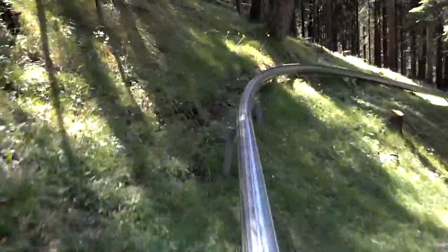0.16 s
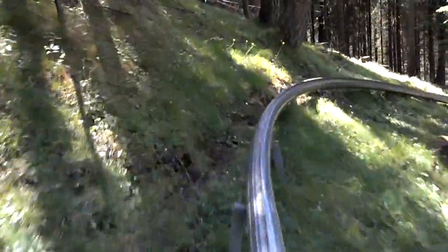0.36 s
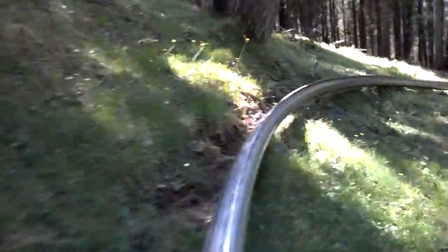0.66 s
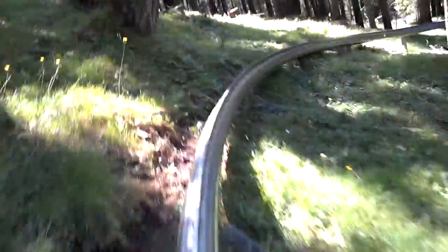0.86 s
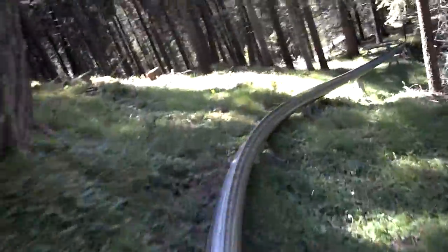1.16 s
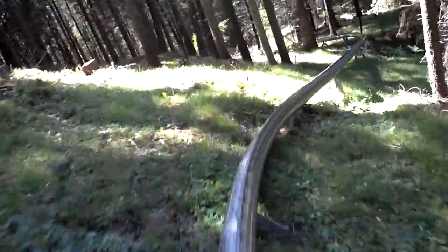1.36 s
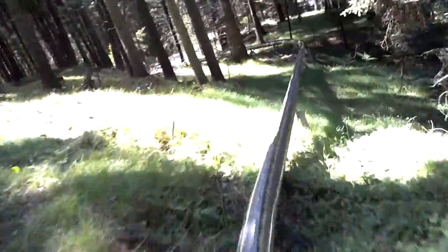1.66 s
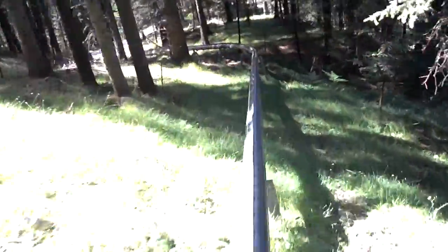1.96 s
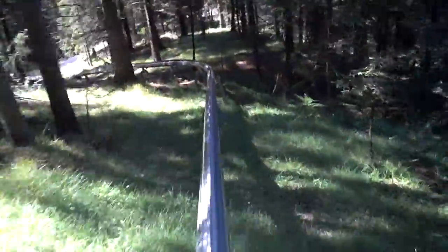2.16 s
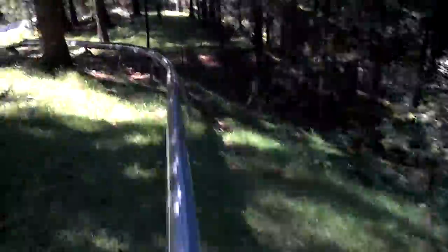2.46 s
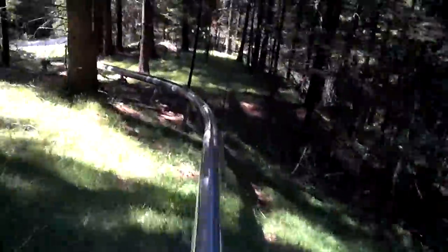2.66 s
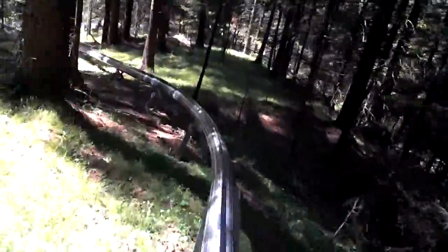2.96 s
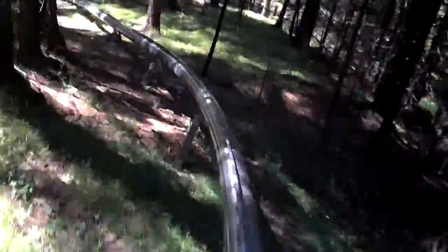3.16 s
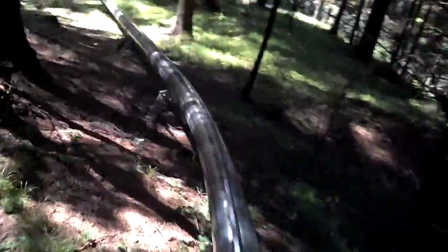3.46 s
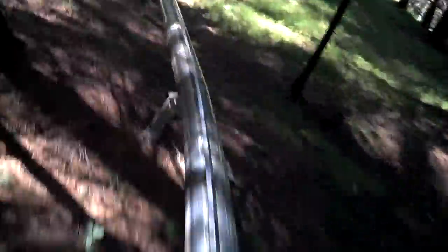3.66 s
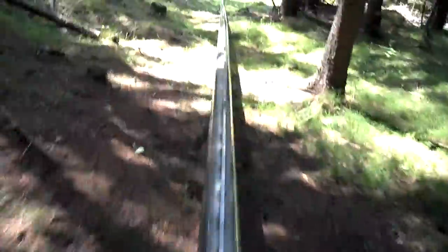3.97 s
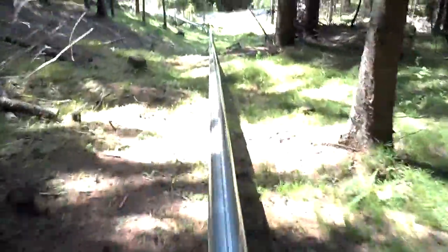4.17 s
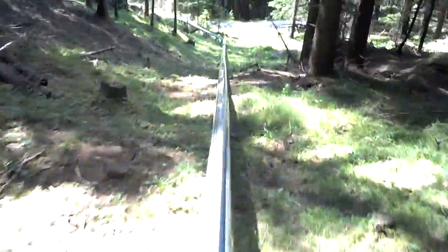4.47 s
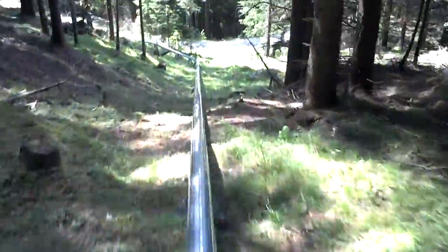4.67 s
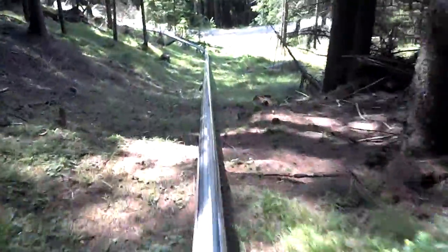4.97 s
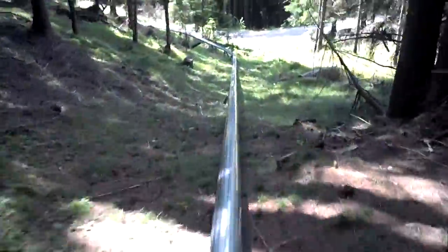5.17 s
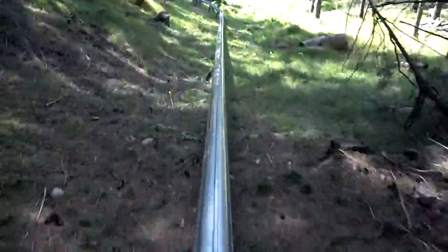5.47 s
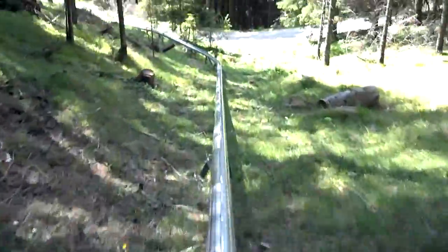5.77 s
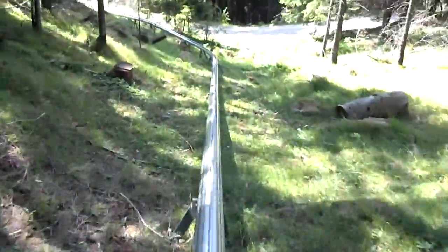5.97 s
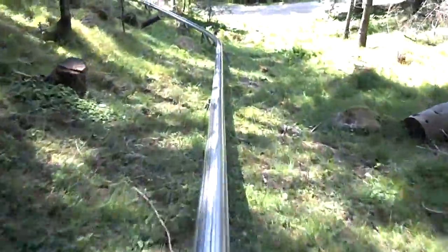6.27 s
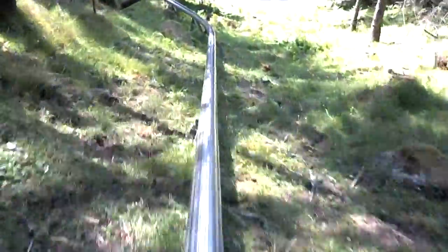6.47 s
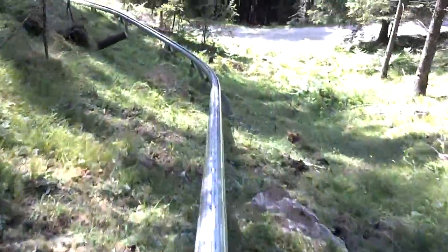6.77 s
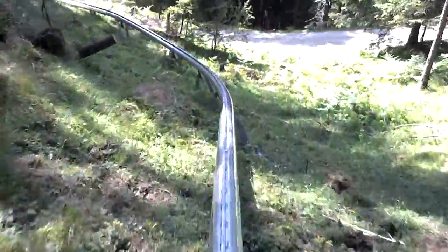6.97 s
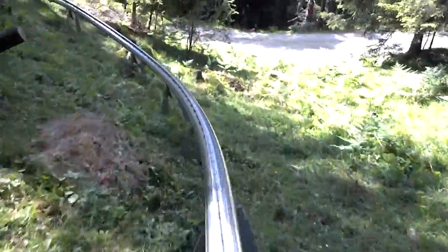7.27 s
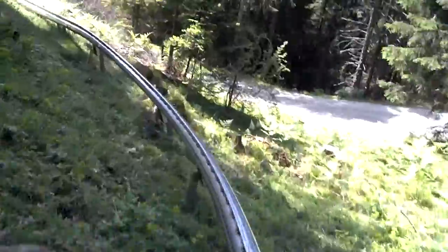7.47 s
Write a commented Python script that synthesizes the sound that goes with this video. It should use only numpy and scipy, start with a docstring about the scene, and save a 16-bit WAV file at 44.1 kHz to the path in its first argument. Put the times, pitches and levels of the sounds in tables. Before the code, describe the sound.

Heard from the moving sled itself, wheels drone and rattle continuously along a steel rail outdoors. Irregular thumps, knocks and bright clinks jolt the frame, one especially hard early on. The middle is somewhat quieter with faint whines and loose ticking; then a wheel's flat spot chatters fast and loudly before easing back to rough rolling and knocks. Low wind buffets the microphones.

```python
"""Sled on a steel tube rail

A sled rolls down a steel rail, heard through two microphone ports in a case that rides on it.
Wheel drone, frame rattle and scraping are noise through resonances; a flat spot knocks once a turn and chatters.
Joints thump and jolt the frame as short rings and bursts, parts tick and clink, grit crackles, tones whine.
Low wind noise buffets the case. Each channel is one port minus the other, delayed."""
import sys
import numpy as np
from scipy import signal
from scipy.fft import rfft, irfft, next_fast_len
from scipy.io import wavfile
from scipy.ndimage import uniform_filter1d

SR = 44100
rng = np.random.default_rng(int(sys.argv[2]) if len(sys.argv) > 2 else 0)


def materialize(psi):
    """Save the field psi as 16-bit PCM at rate SR to the path in sys.argv[1].

    A 1-D psi becomes a single channel; in a 2-D psi each row is a channel.
    """
    bounded = np.clip(np.atleast_2d(psi).T, -1, 1)
    quanta = np.round(bounded * 32767).astype(np.int16)
    wavfile.write(sys.argv[1], SR, quanta)


N = 335601
LEAD_S = .005  # soft start ahead of each blow

# rolling levels: time_s [s], frame_db [dB], drone_db [dB]
ROLLING = [(0, -25, -21), (.25, -25.5, -27.5), (.6, -23.5, -30.5), (.72, -21, -22), (1.1, -27, -27.5),
           (1.52, -21.5, -23), (1.7, -28, -28.5), (1.92, -27, -24.5), (2.3, -29.5, -32.5),
           (2.55, -32.5, -29.5), (2.9, -34, -28), (3.25, -26.5, -29.5), (3.5, -27.5, -26), (3.8, -30, -24),
           (4.15, -19.5, -25.5), (4.42, -24.5, -25), (4.72, -31, -28), (5.05, -24, -22), (5.45, -26.5, -28),
           (5.7, -23.5, -22.5), (6.0, -27.5, -23), (6.3, -19, -20), (6.8, -22, -20.5), (7.05, -21.5, -27),
           (7.3, -23.5, -23), (7.61, -18.5, -18.5)]
# flat spot's share of the wheel drone's power: time_s [s], share [0-1]
FLAT_SHARE = [(0.0, .8), (0.33, .8), (0.4, .2), (2.4, .2), (2.47, .96), (3.0, .96), (3.3, .75), (3.6, .5),
              (4.1, .4), (4.45, .3), (4.55, .97), (5.02, .97), (5.2, .65), (5.4, .45), (5.9, .55),
              (6.3, .6), (6.95, .55), (7.0, .2), (7.61, .2)]
# frame resonances: pitch_hz [Hz], width_hz [Hz], level_db [dB, relative]
FRAME = [(369, 150, -1.5), (627, 110, 0), (787, 181, -4), (1200, 260, -9.5), (1420, 162, -10),
         (1680, 136, -7.5), (1850, 254, -9.5), (2350, 300, -13.5)]
# rail resonances, a low, a middle and a high table: pitch_hz [Hz], width_hz [Hz], level_db [dB, relative]
RAIL = [
    [(605.6, 57, 2.5), (662.5, 53, 2)],
    [(888, 78, 4), (1055, 53, 4.5)],
    [(1545, 100, 3), (1790, 85, 8), (1905, 320, 1.5)],
]
# ringing steel parts: pitch_hz [Hz], width_hz [Hz], level_db [dB, relative]
STEEL = [(3227, 62, 3.2), (4020, 260, 3), (5200, 590, 5.3), (6730, 91, 1), (9370, 32, 2), (9800, 62, 1.4)]
# flat-spot blows: time_s [s], peak_db [dB], low_db, middle_db, high_db [dB, ring balance],
# tick_db [dB against peak_db]
CHATTER = [(5.224, -15, -8, -13, -27, -32), (5.256, -12, -7, -13, -15, -27),
           (5.291, -9.5, -12, -14, -12, -34), (5.33, -14, -1, -24, -10, -39), (5.362, -10, 0, -11, -9, -40),
           (5.401, -10.5, 1, -28, -15, -41), (5.434, -11, -7, -13, -7, -28), (5.47, -8, -5, -11, -6, -23),
           (5.504, -7, -6, -9, -6, -24), (5.539, -8.5, -5, -12, -10, -27), (5.579, -19, 2, -6, -2, -29),
           (5.612, -6.5, -7, -7, -4, -26), (5.647, -6.5, -5, -11, -11, -30),
           (5.678, -12.5, -8, -16, -8, -13), (5.714, -14, -2, -14, 3, -24), (5.75, -6, -2, -15, -11, -32),
           (5.786, -15.5, 1, -4, -6, -18), (5.824, -7, -1, -23, -13, -26), (5.855, -7.5, -3, -15, -21, -41),
           (5.89, -14.5, 0, -7, -12, -37), (5.924, -7, -11, -10.5, -12, -31),
           (5.958, -6, -2.5, -11, -8.5, -29), (5.992, -6.5, -8.5, -14, -16, -26),
           (6.028, -5.5, -2, -10, -11, -32), (6.061, -6.5, -6.5, -20, -14, -27),
           (6.095, -6, -7, -13, -9, -24), (6.132, -5.5, -7, -12.5, -12, -29),
           (6.167, -8.5, 2, -17, -16, -41), (6.201, -7, -9, -14, -11, -27), (6.236, -5, -14, -9, -9, -28),
           (6.268, -7, -14, -9, -3, -25), (6.303, -3, -6, -13, -13, -25), (6.338, -9, -4, -16, -11, -22),
           (6.375, -6, 0, -22, -8, -38), (6.41, -5.5, -5, -26, -6, -35), (6.443, -5.5, 3, -27, -6, -35),
           (6.477, -7, -4, -7, -9, -29), (6.515, -11, -7, -12, -7, -27), (6.548, -5.5, -2, -18, -11, -36),
           (6.58, -7, -4, -11, -7, -24), (6.615, -4.5, -9, -8.5, -9, -30), (6.65, -3.5, -6, -9, -8, -31),
           (6.685, -3.5, -8, -10, -10, -22), (6.719, -5.5, -15, -11, -14, -27),
           (6.753, -4.5, -12, -10, -10, -23), (6.787, -7, -16, -12, -9, -23),
           (6.822, -5, -8.5, -7, -8, -24), (6.858, -4, -11, -5, -2, -28), (6.892, -1.5, -11, -5, -6, -25),
           (6.927, -3.5, -11, -9, -12, -26), (6.945, -7, -14, -8, -7, -15)]


def gain_of(db):
    """dB to gain."""
    return 10 ** (np.asarray(db) / 20)


def evened(x):
    """Scales each row to rms 1."""
    return x / np.sqrt(np.mean(abs(x) ** 2, -1, keepdims=True) + 1e-20)


def read(points, hz, axis=1):
    """A column of a table over log frequency."""
    table = np.array(points)
    return np.interp(np.log(hz + 1), np.log(table[:, 0] + 1), table[:, axis])


def curve(rows, axis=1):
    """A column of a table over time."""
    table = np.array(rows)
    return np.interp(np.arange(N) / SR, table[:, 0], table[:, axis])


def lumps(per_s):
    """Random unevenness of rms 1 that changes about per_s times a second."""
    span = max(round(SR / per_s / 2), 1)
    smoothed = uniform_filter1d(rng.standard_normal(N), span)
    return evened(uniform_filter1d(smoothed, span))


def modes(table, hz):
    """Response of a body: single poles of alternating sign."""
    return sum((-1) ** k * gain_of(db) / (1 + 2j * (hz - f) / w) for k, (f, w, db) in enumerate(table))


def case(hz):
    """The steep low-pass of the case."""
    b, a = signal.butter(4, 1930, analog=True)  # cutoff in Hz, as is hz
    return signal.freqs(b, a, hz)[1]


def muffled(hz):
    """Frame resonances behind the case."""
    return modes(FRAME, hz) * case(hz)


def metal(hz):
    """Colour of scraping and ticking steel: a broad slope with a few ringing parts."""
    # broad colour: pitch_hz [Hz], level_db [dB, relative]
    slope = [(1500, -1.5), (2600, 6.5), (3300, 0), (4100, -3), (5200, -7), (6000, -3.5), (6700, -4.5),
             (7500, -5.5), (9000, -15.5), (9800, -17.5), (11000, -22.5), (13000, -24), (14800, -41),
             (15600, -44)]
    return gain_of(read(slope, hz)) * np.sqrt(1 + abs(modes(STEEL, hz)) ** 2)


def at_ports(envelope, colour, noisy=True):
    """Noise under an envelope (or bare pulses), coloured; the second port shares only part of it."""
    # second port: pitch_hz [Hz], level_db [dB against the first], likeness [0-1]
    ports = [(193, 7.5, 1), (375, 4, 1), (630, -5, 0.99), (810, -5, 1), (1084, -2.5, 0.54),
             (1780, -8.5, 0.31), (2800, -11, 0.5), (3400, 4.5, 0.06), (5800, 1, 0), (9440, 3.5, 0),
             (10200, -19, 0)]
    size = envelope.shape[-1]
    hz = np.fft.rfftfreq(size, 1 / SR)
    noise = rng.standard_normal((*envelope.shape[:-1], 2, size)) if noisy else np.ones((2, 1))
    z = rfft(noise * envelope[..., None, :])
    same = np.clip(read(ports, hz, axis=2), 0, 1)
    # the unlike part is separate noise, or for pulses the same pulse turned a quarter cycle
    other = np.sqrt(1 - same ** 2) * (1 if noisy else .5j)
    second = gain_of(read(ports, hz)) * (same * z[..., 0, :] + other * z[..., 1, :])
    both = np.stack([z[..., 0, :], second], -2)
    return irfft(both * evened(colour(hz))[..., None, :], size)


def add(mix, s, db, sounds, peak=False):
    """Lays each sound at its time; db is the first port's rms over its loudest 5 ms, or its peak."""
    length = sounds.shape[-1]
    fade = signal.windows.tukey(2 * length, .3)[length:]
    fade = fade * np.sin(np.pi / 2 * np.minimum(np.arange(length) / (LEAD_S * SR), 1)) ** 2
    for at, level_db, x in zip(s.ravel(), db.ravel(), sounds):
        part = mix[:, max(round(at * SR), 0):][:, :length]
        loudest = abs(x[0]).max() if peak else np.sqrt(uniform_filter1d(x[0] ** 2, size=220).max())
        part += (gain_of(level_db) * x * fade / loudest)[:, :part.shape[1]]


def rolling():
    """Uneven contact drives wheels, frame, metal and rail together; loose parts add small random rattles."""
    # wheel resonances: pitch_hz [Hz], width_hz [Hz], level_db [dB, relative]
    wheels = [(225.7, 35, -3), (315, 55, -2.5), (365, 114, -9.5)]
    # hum of the rail's low ring: time_s [s], level_db [dB]
    rail_hum = [(5.1, -52), (5.35, -33), (5.8, -29), (6.1, -37), (6.45, -27.5), (6.9, -29), (7.1, -47),
                (7.35, -40), (7.5, -23), (7.61, -37)]
    contact = lumps(per_s=21.7)
    sizes = gain_of(1.3 * np.minimum(rng.exponential(1, N), 4))
    blows = sizes * (rng.random(N) < 90. / SR)  # about 90 a second
    rattles = evened(signal.lfilter([1], [1, -np.exp(-1 / (0.0032 * SR))], blows))  # 3.2 ms decay
    size = next_fast_len(N)
    # unevenness in dB, amount of rattle, colour, level; metal splits at 7600 Hz into scrape and bright edge
    parts = [
        (1.5, .05, lambda hz: modes(wheels, hz), gain_of(curve(ROLLING, axis=2))),
        (2.4, 0.14, muffled, gain_of(curve(ROLLING))),
        (2.3, 0.33, lambda hz: metal(hz) / (1 + (hz / 7600) ** 6), scraping(axis=1)),
        (3.5, 0.28, lambda hz: metal(hz) / (1 + (7600 / (hz + 1)) ** 6), scraping(axis=2)),
        (1.8, .05, lambda hz: modes(RAIL[0], hz) * case(hz), gain_of(curve(rail_hum)))]
    out = np.zeros((2, N))
    for k, (uneven_db, loose, colour, level) in enumerate(parts):
        own = 0.46 * lumps(per_s=9.1)  # each part also wanders on its own
        drive = evened(gain_of(uneven_db * (contact + own)) + loose * rattles) * level
        if k == 0:  # the flat spot plays the rest of the drone
            drive *= np.sqrt(1 - np.clip(curve(FLAT_SHARE), 0, 1))
        out += at_ports(np.pad(drive, (0, size - N)), colour)[:, :N]
    return out


def scraping(axis):
    """Level of the steady scrape (axis 1) or its bright edge (axis 2), with scuffs swelling over it."""
    # steady scrape: time_s [s], scrape_db [dB], edge_db [dB]
    steady = [(0, -36.5, -54), (.25, -46.5, -57.5), (.7, -41.5, -56), (1.3, -43, -56.5), (1.75, -48.5, -69),
              (2.15, -47, -57), (2.3, -55, -67), (2.65, -53.5, -70), (3.05, -49, -59), (3.4, -48.5, -60),
              (3.6, -55, -68), (3.9, -57, -78), (4.1, -44, -61), (4.4, -37.5, -53), (4.66, -49.5, -66),
              (5.3, -48.5, -60), (6.2, -50, -75), (6.5, -44.5, -57), (7.1, -45.5, -56.5),
              (7.55, -44.5, -55)]
    # short scuffs: middle_s [s], scrape_db [dB], edge_db [dB], length_s [s]
    scuffs = [(0.361, -36.5, -43, 0.12), (0.631, -45, -71, .05), (0.799, -36.5, -47, 0.12),
              (0.926, -54, -51, .06), (1.005, -58, -53, 0.053), (1.525, -45, -50, 0.16),
              (1.64, -40, -43, 0.12), (1.888, -45, -74, 0.08), (1.959, -43, -53, .06),
              (2.388, -39.5, -48.5, 0.31), (2.824, -46, -59, 0.16), (3.39, -42, -55, 0.056),
              (3.522, -44, -53.5, 0.14), (3.899, -62, -45.5, 0.045), (4.168, -42.5, -47, 0.31),
              (4.396, -40, -60, 0.054), (5.055, -52, -49, 0.12), (5.676, -43, -57, 0.068),
              (5.814, -57, -53, 0.14), (6.337, -34, -42, 0.14), (6.45, -45, -47, 0.18),
              (6.985, -34, -46, 0.21), (7.186, -51, -64, .08), (7.25, -55, -56, 0.036),
              (7.44, -44, -55, 0.23), (7.593, -38, -43, 0.097)]
    t = np.arange(0, N + 32, 32) / SR
    swells = sum(gain_of(row[axis]) * np.maximum(1 - 2 * abs(t - row[0]) / row[3], 0) ** 2 for row in scuffs)
    return gain_of(curve(steady, axis=axis)) + np.interp(np.arange(N) / SR, t, swells)


def flat_spot():
    """A pulse once a wheel turn rings the hub, its strength varying, so its overtones follow the speed."""
    # wheel turns so far: time_s [s], turns [count]
    turn_count = [(0.02, 0.041), (0.36, 9.883), (2.42, 65.95), (2.58, 70.2), (2.7, 73.4), (3.06, 83.06),
                  (3.18, 86.26), (3.42, 92.52), (3.6, 97.19), (4.15, 111.1), (4.5, 120.12), (4.62, 123.4),
                  (4.74, 126.72), (4.86, 130.14), (4.98, 133.64), (5.12, 137.76), (5.317, 143.511),
                  (5.63, 152.36), (6.1, 165.961), (7.04, 193.09), (7.61, 209.6)]
    # hub resonances: pitch_hz [Hz], width_hz [Hz], level_db [dB, relative]
    hub = [(240, 24, 0), (287, 30, 4.5), (320, 24, 4), (378, 20, 0), (430, 14, -2)]
    level = np.sqrt(np.clip(curve(FLAT_SHARE), 0, 1)) * gain_of(curve(ROLLING, axis=2))
    speed = uniform_filter1d(np.gradient(curve(turn_count)), SR // 10)
    turns = np.cumsum(speed) + 0.235 + .0005 * lumps(per_s=27.0)  # phase offset and slight jitter
    strikes = np.diff(np.floor(np.maximum.accumulate(turns)), prepend=0) > 0
    pulses = evened(strikes * gain_of(.7 * rng.standard_normal(N)))
    drive = np.pad(pulses * level, (0, next_fast_len(N) - N))
    return at_ports(drive, lambda hz: modes(hub, hz) * case(hz), noisy=False)[:, :N]


def chatter():
    """The flat spot chatters: each blow and its bounce ring the rail a little differently."""
    # random pitch shift of the low, middle and high rings: share [ratio]
    ring_shift = (.004, 0.026, .025)
    # the wheel lands again: earliest_s [s], latest_s [s], level_db [dB against the blow]
    bounce = (0.00081, 0.003975, -6)
    # axle resonance: pitch_hz [Hz], width_hz [Hz], level_db [dB, evened out below]
    axle = [(383.4, 16.6, 0)]
    axle_db = -11  # on the scale of the ring balance
    s, db, *rings_db, _ = np.transpose(CHATTER)[:, :, None]
    chance = rng.standard_normal((len(s), 3, 1))
    shift = 1 + np.reshape(ring_shift, (3, 1)) * chance
    lag = rng.uniform(bounce[0], bounce[1], (len(s), 1))
    blow = np.tile(1. * (np.arange(4096) == round(LEAD_S * SR)), (len(s), 1))

    def struck_rail(hz):
        """The three rings and the axle; the bounce strikes the upper two again."""
        low, middle, high = (
            gain_of(rings_db[k]) * evened(modes(RAIL[k], hz * shift[:, k]) * case(hz)) for k in range(3))
        again = 1 + gain_of(bounce[2]) * np.exp(-2j * np.pi * hz * lag)
        return low + (middle + high) * again + gain_of(axle_db) * evened(modes(axle, hz))
    out = np.zeros((2, N))
    add(out, s - LEAD_S, db, at_ports(blow, struck_rail, noisy=False), peak=True)
    return out


def thumps():
    """Wheels thump and clank on joints: short decaying sines, alike at both ports."""
    # thumps: time_s [s], level_db [dB], pitch_hz [Hz], decay_s [s, held to 3-30 ms]
    joints = [(0.32, -13, 320, 0.0099), (0.365, -8.5, 352, 0.018), (0.624, -20, 387, 0.029),
              (0.719, -13, 249, 0.02), (0.739, -11, 290, .008), (0.751, -18, 264, 0.0077),
              (0.8134, -2, 315, 0.0075), (0.91, -11.5, 303, 0.023), (1.005, -16, 356, 0.0053),
              (1.155, -13.5, 323, 0.007), (1.37, -10, 315, 0.012), (1.591, -14.5, 288, 0.014),
              (1.616, -9.5, 330, 0.0054), (1.63, -13, 830, 0.0035), (1.63, -13.5, 487, 0.0098),
              (1.632, -15, 302, .01), (1.639, -16, 408, .005), (1.942, -12, 318, 0.0064),
              (1.962, -4.5, 375, 0.004), (1.962, -5, 213, 0.0088), (1.999, -22, 400, 0.0041),
              (2.043, -13, 381, 0.016), (2.313, -5, 353, 0.011), (2.349, -14, 364, 0.0093),
              (2.419, -8.5, 290, 0.0077), (3.045, -16.5, 303, 0.017), (3.241, -15, 292, 0.041),
              (3.373, -9, 341.6, 0.02), (3.375, -16, 235, .02), (3.63, -11, 300, 0.0098),
              (3.778, -19, 457, 0.011), (3.823, -17, 314, 0.009), (3.997, -18, 463, 0.019),
              (4.143, -15.5, 356, 0.0099), (4.349, -12, 309, 0.019), (4.409, -12, 315, 0.028),
              (4.431, -13.5, 372, 0.0036), (4.469, -14.5, 287, 0.021), (5.049, -15, 380, 0.011),
              (5.22, -12, 236, 0.015), (5.684, -11, 287, 0.0078), (5.815, -20, 315, 0.011),
              (5.89, -11.5, 383, 0.0072), (6.262, -9.5, 374, 0.013), (6.304, -12, 400, 0.0055),
              (6.318, -6, 330, .008), (6.339, -15, 473, 0.0049), (6.369, -19, 310, 0.02),
              (6.411, -9.5, 314, 0.011), (6.413, -11.5, 620, .004), (6.549, -12.5, 327, 0.0076),
              (6.581, -23, 382, 0.01), (7.004, -5, 334, 0.011), (7.047, -17.5, 355, 0.025),
              (7.336, -14.5, 204, 0.013), (7.479, -21, 350, 0.017), (7.563, -6.5, 325, 0.015)]
    s, db, hz, decay = np.transpose(joints)[:, :, None]
    t = np.maximum(np.arange(4096) / SR - LEAD_S, 0)
    rise = 1 - np.exp(-(t / .0028) ** 2)
    ring = rise * np.exp(-t / np.clip(decay, .003, .03)) * np.sin(2 * np.pi * hz * t)
    out = np.zeros((2, N))
    add(out, s - LEAD_S - .002, db, np.stack([ring, ring], axis=1))
    return out


def knocks():
    """Jolts through the frame: rough noise bursts coloured by its resonances."""
    # knocks: time_s [s], level_db [dB], tilt_db [dB per octave], length_s [s, held to 1-30 ms]
    jolts = [(0.111, -26, 13, 0.0043), (0.295, -24, 12, 0.012), (0.317, -22, 16, 0.011),
             (0.342, -21, 4, 0.015), (0.366, -19, 3, 0.0096), (0.487, -19, 1, 0.0043),
             (0.627, -17, 1.5, 0.017), (0.724, -15.5, -9, 0.0082), (0.744, -20, -7, .005),
             (0.795, -13.5, -4.5, 0.018), (0.807, -11, 8, 0.0079), (0.912, -28, -11, 0.0026),
             (0.929, -14.5, 1, 0.006), (0.978, -27, 11, .006), (1.007, -21, 4, 0.0042),
             (1.112, -19.5, -1, 0.029), (1.15, -23, 3, 0.012), (1.39, -21, 6, 0.015),
             (1.492, -16.5, 3, 0.0092), (1.628, -4, 4.5, 0.0065), (1.773, -25, 5, 0.0033),
             (1.877, -25, 2.5, .015), (1.952, -14, -2, 0.014), (1.995, -27, 9, 0.0034),
             (2.044, -25, 1, 0.0051), (2.29, -22, 2, 0.012), (2.316, -13.5, -3.5, 0.01),
             (2.341, -19, 3, .004), (2.348, -14.5, 2, 0.011), (2.397, -19.5, 0.5, 0.034),
             (2.449, -22, -2, 0.01), (3.013, -20.5, -11, 0.0061), (3.044, -22, 2.5, 0.028),
             (3.122, -18, -4, 0.0057), (3.2, -20.5, -2, 0.0034), (3.228, -24, 0, 0.0057),
             (3.255, -26, 5, 0.01), (3.279, -22, 5, .012), (3.372, -9.5, 0, 0.013), (3.5, -15, -9, 0.01),
             (3.516, -19.5, 6, 0.0022), (3.536, -24, 7, 0.0046), (3.786, -18, -4.5, 0.017),
             (3.852, -24, -6, 0.0024), (3.901, -20, -7, 0.0075), (3.921, -24, -8, 0.0041),
             (4.007, -19, -22, 0.0031), (4.099, -19, 6.5, 0.034), (4.146, -12.5, -3, 0.005),
             (4.157, -17, 5, 0.02), (4.231, -16, 11, .009), (4.341, -18, 5, 0.0049),
             (4.356, -16, 6.5, 0.035), (4.41, -18.5, 6, 0.0033), (4.473, -20, 3, 0.012),
             (4.52, -26, 5, .006), (4.918, -29, -6, .008), (5.008, -19, -9, 0.017),
             (5.029, -13.5, 3.5, 0.021), (5.153, -17, -1, 0.009), (5.676, -12.5, 1.5, 0.013),
             (5.82, -13, 0.5, 0.016), (6.304, -13.5, 2, 0.005), (6.313, -9.5, -1, 0.013),
             (6.353, -22, 18, .008), (6.93, -16.5, 3, 0.034), (6.993, -13.5, 0, 0.013),
             (7.04, -23, 6, .0024), (7.08, -17, 4, 0.0039), (7.241, -16, 4.5, 0.0072),
             (7.403, -11.5, 2, 0.0039), (7.469, -12.5, 1.5, 0.01), (7.504, -12, 2.5, 0.0029),
             (7.56, -8.5, -1, 0.015)]
    s, db, tilt_db, length = np.array(jolts).T[:, :, None]
    t = np.maximum(np.arange(4096) / SR - LEAD_S, 0)
    burst = (1 - np.exp(-t / 0.0013)) * np.exp(-t / np.clip(length, .001, .03))

    def colour(hz):
        """Muffled frame with each knock's tilt."""
        return muffled(hz) * gain_of(tilt_db * np.log2(hz / 1000 + 0.16))
    out = np.zeros((2, N))
    add(out, s - LEAD_S - .001, db, at_ports(burst, colour))
    return out


def ticks():
    """Steel on steel, also at each chatter blow: brief bright noise bursts with a fainter tail."""
    # ticks: time_s [s], level_db [dB], tilt_db [dB per octave], length_s [s, held to 0.5-30 ms]
    steel_ticks = [(.038, -27, -8.5, 0.0074), (.2609, -36, -6, 0.0024), (.2933, -42, 0, .003),
                   (.3035, -37, 4, .0035), (.323, -30.5, 2, 0.0022), (.4854, -43, 9, .002),
                   (.591, -32.5, 0, 0.0033), (.7158, -35, 0, 0.0034), (.812, -29.5, -1, 0.0046),
                   (.9254, -32, -1.5, 0.0024), (.9322, -37, 20, 0.0014), (.985, -40, 5, .007),
                   (1.005, -42, 7, .0044), (1.3744, -34.5, -1.5, 0.03), (1.487, -31.5, -3, .009),
                   (1.628, -16.5, 7.5, 0.0043), (1.957, -38, 3, .007), (2.047, -27, -7.5, 0.0072),
                   (2.3166, -41, 1, 0.0069), (2.341, -23.5, -7, .015), (2.452, -38, -2, 0.012),
                   (2.642, -53, 10, .002), (2.785, -30, -10, 0.013), (3.015, -30, -10.5, 0.0048),
                   (3.079, -35, -5.5, .004), (3.2, -46, 5, .004), (3.278, -35.5, -2, 0.0088),
                   (3.3732, -30.5, 3.5, 0.006), (3.43, -44, 8, 0.0031), (3.518, -43, 17, 0.0023),
                   (3.627, -40, -6, 0.0027), (3.663, -44, -4, .003), (3.746, -28, -13, .005),
                   (3.795, -32, -9.5, 0.0053), (3.818, -26, -9.5, 0.0065), (3.852, -29, -10.5, .005),
                   (3.896, -26, -8.5, 0.0046), (3.918, -24, -9.5, 0.0056), (4.014, -42, 4, 0.0057),
                   (4.091, -25, -9, .005), (4.142, -24, -8, .006), (4.177, -28, -4.5, 0.0028),
                   (4.2047, -31, 4, .002), (4.23, -32.5, 3, 0.0061), (4.283, -38, -3, 0.0013),
                   (4.332, -34.5, -4, .005), (4.365, -28, 1, 0.006), (5.033, -19.5, -5.5, 0.011),
                   (5.0863, -39, -2, .005), (5.136, -37, -4, .003), (5.183, -41, 0, .003),
                   (5.686, -29, 4, 0.0078), (5.7488, -36, 2, .0045), (5.8096, -47, 15, .001),
                   (5.8325, -34, 18, 0.0014), (6.301, -30.5, -2, 0.01), (6.2917, -33, -2, .003),
                   (6.3715, -26.5, 4.5, 0.001), (6.4274, -41, 9, 0.0018), (7.082, -42, 6, 0.0037),
                   (7.241, -36, 7, 0.0063), (7.412, -31, -3, .009), (7.462, -33, 4, 0.0067),
                   (7.488, -42, 14, .002), (7.5603, -31, 1, 0.0036), (7.572, -32.5, 3, .007)]
    # every chatter tick: tilt_db [dB per octave], length_s [s]
    chatter_tick = (-6, 0.0037)
    blows = [(row[0], row[1] + row[-1], *chatter_tick) for row in CHATTER]
    s, db, tilt_db, length = np.vstack([steel_ticks, blows]).T[:, :, None]
    t = np.maximum(np.arange(2560) / SR - LEAD_S, 0)
    rise = 1 - np.exp(-(t / np.clip(length / 2, .0005, .002)) ** 2)
    burst = rise * (np.exp(-t / np.clip(length, .0005, .03)) + .08 * np.exp(-t / .015))

    def colour(hz):
        """Steel with each tick's tilt."""
        return metal(hz) * gain_of(tilt_db * np.log2(hz / 5000 + 0.087))
    out = np.zeros((2, N))
    add(out, s - LEAD_S - .001, db, at_ports(burst, colour))
    return out


def clinks():
    """Loose fittings clink: short decaying sines, each with a weaker neighbour tone."""
    # clinks: time_s [s], peak_db [dB], pitch_hz [Hz]
    fittings = [(0.1052, -27, 1360), (0.1865, -32, 1610), (0.2394, -25, 1700), (0.3032, -29, 1470),
                (0.3246, -25, 1670), (0.3715, -23, 1650), (0.4793, -19, 1360), (0.5931, -25, 1530),
                (0.6215, -22, 1790), (0.683, -22, 1680), (0.7477, -27, 1250), (0.795, -16, 1670),
                (0.8859, -31, 1420), (0.9248, -24, 1440), (0.9777, -28, 1480), (1.069, -23, 1700),
                (1.1155, -18, 1670), (1.1518, -25, 1750), (1.3806, -18, 1300), (1.491, -14, 1250),
                (1.628, -0.5, 1225), (1.627, -15, 9030), (1.632, -17, 1720), (1.637, -12, 935),
                (1.694, -24, 1700), (1.9969, -21, 1380), (2.045, -29, 1260), (2.2902, -22, 1680),
                (2.318, -18, 1520), (2.347, -15, 1420), (2.4557, -20, 1870), (2.6404, -40, 1400),
                (3.0145, -29, 1680), (3.245, -20, 1770), (3.2809, -16, 1685), (3.3164, -25, 1640),
                (3.373, -4.5, 1700), (3.432, -26, 1680), (3.468, -22, 1770), (3.5, -19, 1250),
                (3.5348, -18, 1600), (3.6057, -25, 1590), (3.625, -22, 1540), (3.663, -22, 1500),
                (3.751, -21.5, 1530), (3.8515, -21, 1600), (3.919, -15, 1500), (4.0132, -18, 1630),
                (4.0542, -26, 1600), (4.094, -18, 1600), (4.117, -19, 1510), (4.16, -17, 1430),
                (4.176, -22.5, 4030), (4.2298, -12, 1440), (4.2298, -35, 4000), (4.24, -11.5, 1420),
                (4.281, -27, 4100), (4.269, -17, 1410), (4.337, -17, 1500), (4.356, -13, 1450),
                (4.41, -19, 1560), (4.4304, -20, 1760), (4.521, -24, 1460), (4.8454, -33, 1250),
                (5.009, -25, 1400), (5.032, -15, 1460), (5.07, -22, 1370)]
    decay_s = 0.0028
    s, db, hz = np.transpose(fittings)[:, :, None]
    t = np.maximum(np.arange(2048) / SR - LEAD_S, 0)
    near = hz * rng.uniform(0.82, 1.456, hz.shape)
    tones = np.sin(2 * np.pi * hz * t) + 0.28 * np.sin(2 * np.pi * near * t)
    ring = (1 - np.exp(-t / 0.0012)) * np.exp(-t / decay_s) * tones
    out = np.zeros((2, N))
    add(out, s - LEAD_S, db, np.stack([ring, 0.26 * ring], axis=1), peak=True)
    return out


def grains(per_s, spread_db, body):
    """Scattered grains, each ringing one resonance of the body."""
    hz, width, db = np.transpose(body)[:, :, None]
    t = np.arange(1024) / SR
    rings = gain_of(db) * np.exp(-np.pi * width / 2 * t) * np.sin(2 * np.pi * hz * t)
    chance = rng.random((N, 3))  # whether a grain falls, its size, its resonance
    out = np.zeros(N + len(t))
    for at in np.flatnonzero(chance[:, 0] < per_s / SR):
        size_db = spread_db * min(-np.log(chance[at, 1] + 1e-9), 4)
        out[at:at + len(t)] += gain_of(size_db) * rings[int(chance[at, 2] * len(body))]
    return evened(out[:N])


def crackle():
    """Grit under the wheels rings the frame and pings the steel."""
    # grit on the frame: rate_per_s [1/s], level_db [dB against frame rattle], spread_db [dB]
    on_frame = (160, -8, 2.6)
    # grit on the steel: rate_per_s [1/s], level_db [dB against scrape], spread_db [dB]
    on_steel = (120, -9.5, 3.5)
    frame = grains(on_frame[0], on_frame[2], FRAME[:-1]) * gain_of(curve(ROLLING) + on_frame[1])
    steel = grains(on_steel[0], on_steel[2], STEEL[:4]) * scraping(axis=1) * gain_of(on_steel[1])
    # the second port hears both more softly, the pings inverted
    return frame * np.array([[1], [.4]]) + steel * np.array([[1], [-.3]])


def whine(rows):
    """A sine wavering in pitch and level that comes and goes."""
    t = np.arange(round(rows[0][0] * SR), round(rows[-1][0] * SR))
    hz = curve(rows) * (1 + .002 * lumps(per_s=20.))
    level = gain_of(curve(rows, axis=2) + 1.5 * lumps(per_s=15.))
    out = np.zeros(N)
    out[t] = np.sqrt(2) * level[t] * np.sin(2 * np.pi * np.cumsum(hz[t]) / SR)
    return out


def whines():
    """Two faint whines, alike at both ports."""
    # one table per whine: time_s [s], pitch_hz [Hz, before waver], level_db [dB rms, before waver]
    tones = [
        [(3.48, 490, -44), (3.55, 484, -33), (3.65, 482, -31.5), (3.96, 478, -32), (4.06, 468, -40)],
        [(3.25, 236, -33), (3.4, 232, -24), (3.58, 216, -23), (3.9, 215, -24), (4.05, 220, -24),
         (4.2, 230, -24), (4.26, 230, -36)],
    ]
    return sum(map(whine, tones))


def wind():
    """Lumpy low turbulence, nearly unrelated at the two ports."""
    # wind at each port: time_s [s], level_db [dB]
    strength = [(0, -16), (.1, -32), (.4, -21), (1.0, -22.5), (1.5, -18), (1.7, -15.5), (1.8, -22.5),
                (2.25, -28), (2.5, -22), (3.2, -23.5), (4.3, -21.5), (4.4, -10), (4.5, -26), (5.1, -14.5),
                (5.4, -18.5), (5.8, -17.5), (6.65, -20), (6.85, -17.5), (7.1, -20.5), (7.5, -21),
                (7.6, -16)]
    # wind spectrum: pitch_hz [Hz], level_db [dB, relative]
    wind_colour = [(18, -84), (30, -41), (91, 2), (128, 6.5), (280, -2), (502, -19), (803, -23.5),
                   (900, -24), (1170, -69), (1980, -120)]
    size = next_fast_len(N)
    hz = np.fft.rfftfreq(size, 1 / SR)
    own = np.array([lumps(per_s=24.0), lumps(per_s=23.0)])
    gusts = evened(gain_of(0.94 * lumps(per_s=57.0) + 2.0 * own))
    noise = rng.standard_normal((2, N))
    noise += 0.16 * noise[::-1]  # slight leak between the ports
    drive = evened(noise) * gusts * gain_of(curve(strength))
    return irfft(rfft(drive, size) * evened(gain_of(read(wind_colour, hz))), size)[:, :N]


def scene():
    """Everything as it reaches the two ports."""
    wheels_and_rail = rolling() + flat_spot() + chatter() + thumps()
    small_parts = knocks() + ticks() + clinks() + crackle()
    return wheels_and_rail + small_parts + whines() + wind()


def record(dry):
    """Each channel is one port minus the other, delayed; bass cut, peaks round off; then the band limit."""
    port_delay = 17  # samples
    balance_db = .2  # left is raised by this, right lowered
    edge_hz = 15550
    late = np.pad(dry[::-1], ((0, 0), (port_delay, 0)))[:, :N]
    steered = dry - .975 * late
    balanced = steered * gain_of([[balance_db], [-balance_db]])
    cut = signal.sosfilt(signal.butter(2, 50, "high", fs=SR, output="sos"), balanced)
    limited = 1.042 * np.tanh(cut / 1.737)
    band = signal.firwin(511, edge_hz, window=("kaiser", 9), fs=SR)
    return signal.oaconvolve(limited, band[None], "same")


dry = scene()
out = record(dry)
materialize(out)
```